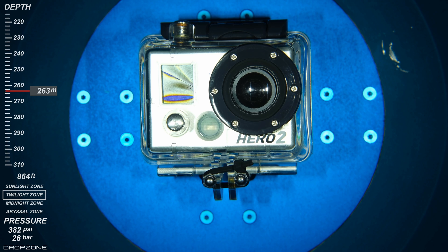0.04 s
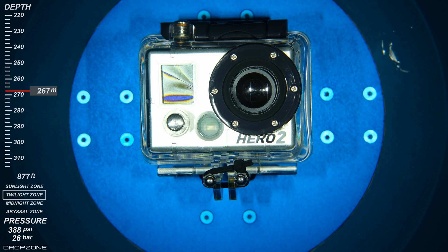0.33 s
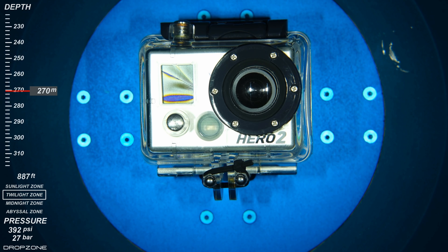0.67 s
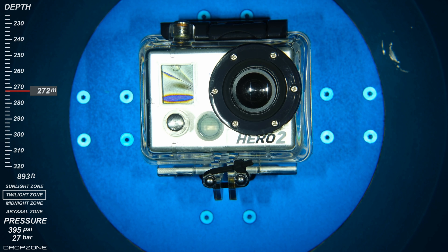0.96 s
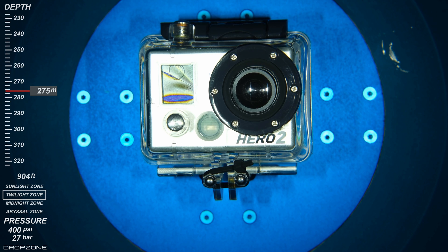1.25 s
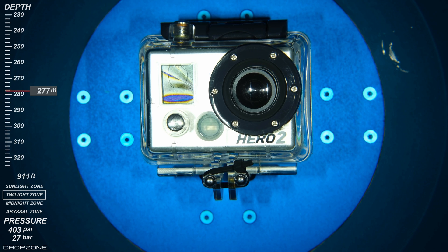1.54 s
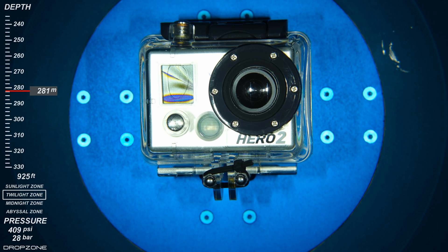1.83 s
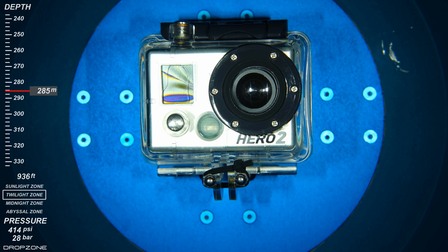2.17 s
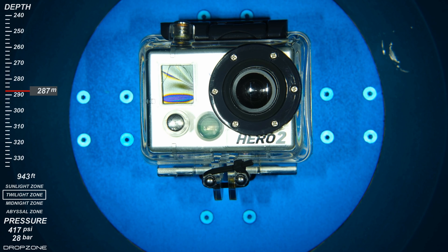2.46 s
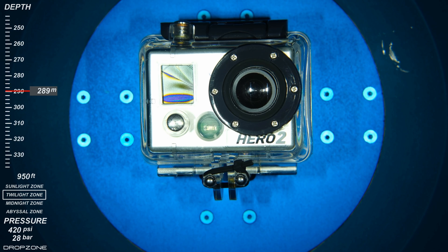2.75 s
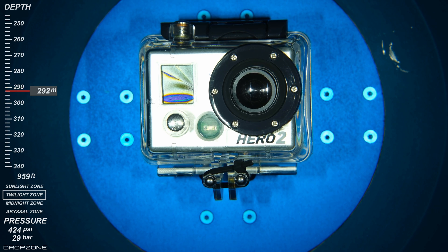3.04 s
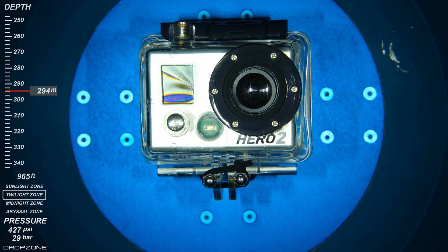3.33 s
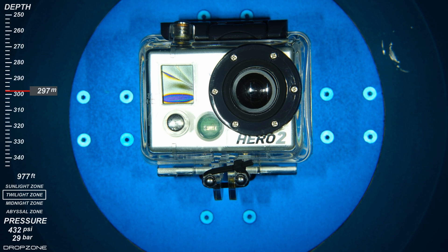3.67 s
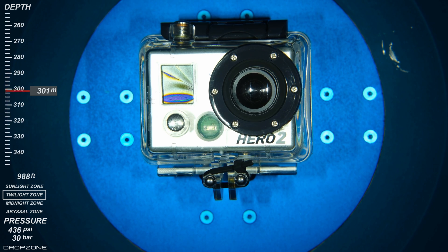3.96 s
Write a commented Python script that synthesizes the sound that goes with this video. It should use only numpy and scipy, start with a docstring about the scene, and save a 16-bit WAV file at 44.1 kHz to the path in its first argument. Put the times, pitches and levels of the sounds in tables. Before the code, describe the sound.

A plastic housing cracks sharply under water pressure, heard through a steel chamber's faintly ringing wall. Small ticks cluster at 0.15 seconds and scatter until 1.5. A loud crack comes at 2 seconds, lighter ones follow, then two strong cracks at 3.6 and 3.8. Throughout, a pump throbs low with soft, rapid valve knocks, alongside faint high water hiss and occasional tiny, dry electrical clicks.

```python
"""A plastic housing cracks and ticks under rising water pressure inside a steel test chamber.
The microphone listens in mono from outside, so each short tear comes through the ringing wall.
Behind the cracks, water hisses through a throttle in the wall's resonances over a low rumble,
and a slow piston pump throbs and knocks its valves. A few dry electrical clicks sit on the line."""
import sys
import numpy as np
from scipy import signal
from scipy.fft import rfft, irfft, next_fast_len
from scipy.io import wavfile
from scipy.ndimage import map_coordinates

SR = 44100
rng = np.random.default_rng(int(sys.argv[2]) if len(sys.argv) > 2 else 0)


def file_out(sig):
    """Save sig as 16-bit WAV at sys.argv[1]."""
    # one column per channel
    cols = np.atleast_2d(sig).T
    # limit, then scale
    lim = np.clip(cols, -1, 1)
    pcm = np.round(lim * 32767).astype(np.int16)
    wavfile.write(sys.argv[1], SR, pcm)


N = 176400

# wall resonances that the flow excites: pitch_hz, width_hz, gain_db
HISS_RESONANCES = [(1440, 93, -27), (1953, 110, -22.5), (2730, 224, -24), (3480, 400, -21.5),
                   (4234, 191, -8.5), (5060, 330, -10.5), (5405, 290, -1.5), (6090, 100, -10.5),
                   (6340, 160, -9.5), (6760, 350, -9), (7270, 240, -9), (8340, 600, -17),
                   (9540, 390, -13.5), (10140, 330, -7), (10590, 290, -6.5), (11100, 550, -12),
                   (11490, 270, -7.5), (11920, 250, -7.5), (12240, 180, -3), (12200, 230, -14.5),
                   (12920, 280, -10), (13800, 250, -23), (14100, 130, -14), (14300, 200, -14.5),
                   (15100, 150, -15.5)]
# the hiss as heard outside the wall: time_s, level_db
HISS_LEVEL = [(0, -69.5), (.4, -70), (.7, -68), (1.8, -68), (2.6, -67), (4, -70.5)]
# spectrum of the rumble under it: frequency_hz, gain_db
RUMBLE_COLOUR = [(15, -17), (40, 2.5), (70, 2), (110, -12.5), (160, -20.5), (300, -29), (600, -39.5),
                 (1200, -48), (3000, -66)]
# bands that come and go in the hiss: start_s, end_s, pitch_hz, width_hz, level_db
SINGING_BANDS = [(0, 0.17, 5480, 30, -75.5), (0, 0.058, 6290, 40, -74), (1.2, 1.92, 12000, 553, -77),
                 (.5, 1.61, 6430, 238, -80), (.6, 2.6, 8190, 293, -84.5), (1.15, 3.55, 5454, 120, -74.5),
                 (2.15, 4, 10150, 453, -73), (2.9, 4, 6770, 301, -76.5), (3.1, 4, 8830, 110, -85),
                 (3.0, 4, 9250, 248, -82)]
# thumps in each pump turn: offset_s, relative_db, pitch_hz, half_length_s, growth_db_per_s
SUCTION_THUMPS = [(0, -37.5, 61, 0.011, 0.66), (0.055, -45.5, 30.5, .007, 1),
                  (0.116, -44.5, 48.4, 0.0098, 2)]
DELIVERY_THUMPS = [(0.0369, -36.5, 31, 0.0061, .2), (.079, -43, 60.3, 0.0058, 1.4),
                   (-.0075, -54.5, 70, 0.0029, 0.44)]
# valve knocks in each turn: offset_s, level_db, pitch_hz, rise_s, t60_s, growth_db_per_s
VALVE_KNOCKS = [(-0.015, -62.5, 221, 0.0063, 0.063, 2.5), (.068, -57, 235.1, 0.0079, 0.085, -0.05),
                (.066, -63.5, 454.6, 0.0052, 0.077, 3), (.066, -66.5, 370, 0.0038, 0.045, 0),
                (.065, -81, 460, 0.0027, 0.022, -10.5), (-0.0002, -82.5, 455, 0.0039, .12, 4.5)]
# squirts as the valves open in each turn: offset_s, level_db, half_length_s
VALVE_SQUIRTS = [(-.021, -81, .003), (-.01, -77.5, 0.002), (.064, -79, .005)]
# spectrum of the squirts: frequency_hz, gain_db
SQUIRT_COLOUR = [(400, 1), (1000, -15), (1450, -4), (1800, -12), (2300, -11), (2700, 7), (3100, -4),
                 (3600, 0), (5000, -16)]
# cracks of the housing: start_s, level_db, tilt_db_per_octave, main_resonance_db
CRACKS = [(0.1324, -57, 2, -11), (0.1379, -49.5, 0, -4), (0.156, -52, -2, -5), (.1735, -64, -1, -2),
          (0.785, -69, 0, -3), (.8012, -60, -1, -1), (.8652, -53.5, 2.5, -2), (1.1785, -57, 2.5, -3),
          (1.1836, -65.5, -4.5, -3), (1.3523, -60, -1, 1), (1.4472, -61, -1.5, -5),
          (1.963, -32.5, -1.5, -2.5), (2.0385, -59, -2.5, -6), (2.2385, -48, 5, -16), (2.46, -60, 0, -9),
          (2.543, -64, -2, -1), (2.8848, -44.5, 8, -10), (3.239, -57, -2, -14), (3.2469, -51, 1, -1),
          (3.5994, -36.5, 2, -3.5), (3.8439, -33.5, -2.5, 4.5), (3.8566, -50.5, -4.5, 4),
          (3.888, -60, -3.5, 2), (3.993, -47.5, 1, -5)]
# resonances that a crack excites: pitch_hz, width_hz, gain_db
CRACK_RESONANCES = [(1457, 71, -14), (1995, 147, -11), (2744, 226, -10.5), (3440, 530, -8.5),
                    (4090, 240, -10), (4570, 280, -8.5), (5398, 380, 3.5), (6340, 120, -4), (6840, 260, -3),
                    (7330, 330, -7), (8530, 350, -8), (9080, 140, -6), (9670, 150, -4), (10130, 380, -1),
                    (10480, 250, -3), (11160, 550, -14), (11700, 260, -18), (12240, 150, -8),
                    (12900, 310, -17), (13900, 250, -12.5), (14400, 220, -16)]
# the chamber's longer ring: pitch_hz, gain_db, t60_s
CHAMBER_RING = [(1464, -34.5, 0.098), (1920, -33, .06), (2030, -32, .04), (3330, -37.5, 0.1),
                (5160, -27.5, 0.068)]
# electrical clicks on the line: time_s, peak_db
LINE_CLICKS = [(.133, -42.5), (0.168, -41.5), (0.2978, -46.5), (.623, -60.5), (0.933, -43), (1.7629, -44),
               (1.973, -40.5), (2.1781, -44), (2.198, -48.5), (2.3063, -63), (2.4979, -47.5), (2.7732, -40),
               (3.003, -41), (3.2077, -40.5), (3.5529, -49)]


def amp(db):
    return 10 ** (np.asarray(db) / 20)


def unit_rms(x):
    return x / np.sqrt(np.mean(x ** 2) + 1e-20)


def fade(t, t60):
    """Holds at 1 until t = 0, then falls 60 dB every t60 seconds."""
    return np.exp(-np.log(1000) * np.maximum(t, 0) / t60)


def add(out, start_s, x):
    """Mix x into out from start_s."""
    i = int(round(start_s * SR))
    a, b = max(i, 0), min(i + len(x), N)
    if b > a:
        out[a:b] += x[a - i:b - i]


def filtered(x, response):
    """Pass x through a response given as a function of frequency."""
    size = next_fast_len(len(x) + 8192)
    return irfft(rfft(x, size) * response(np.fft.rfftfreq(size, 1 / SR)), size)[:len(x)]


def noise(colour):
    """Noise of rms 1, its spectrum drawn through (Hz, dB) points."""
    hz, db = np.transpose(colour)
    white = rng.standard_normal(N)
    return unit_rms(filtered(white, lambda f: amp(np.interp(np.log(f + 1), np.log(hz + 1), db))))


def peaks(f, resonances):
    """Gain of a set of resonances with steep skirts."""
    power = sum(amp(2 * db) / (1 + ((f - hz) / (0.92 * width)) ** 2) ** 3 for hz, width, db in resonances)
    return np.sqrt(power)


def noise_band(hz, width, db=0):
    """White noise through one resonance."""
    gain = peaks(np.fft.rfftfreq(N, 1 / SR), [(hz, width, db)])
    return irfft(rfft(rng.standard_normal(N)) * gain, N)


def wobble(knots_per_s):
    """A smooth random curve."""
    positions = np.linspace(0, knots_per_s * N / SR, 200)
    curve = map_coordinates(rng.standard_normal(64), [positions], mode="mirror")
    return np.interp(np.arange(N), np.linspace(0, N, len(curve)), curve)


def minimum_phase(gain):
    """A response with this gain that rings only after it is struck."""
    cepstrum = irfft(np.log(np.maximum(gain, 1e-6)))
    half = len(cepstrum) // 2
    cepstrum[1:half] *= 2
    cepstrum[half + 1:] = 0
    return np.exp(rfft(cepstrum))


def throttle_flow(wander_db=1.57, rumble_db=-66, singing_fade_s=0.094):
    """Throttled water hisses in the wall's resonances, each drifting in level, over a low rumble."""
    t = np.arange(N) / SR
    floor = amp(-27.5) * rng.standard_normal(N)
    bands = sum(noise_band(*row) * amp(wander_db * wobble(knots_per_s=3)) for row in HISS_RESONANCES)
    hiss_db = np.interp(t, *np.transpose(HISS_LEVEL))
    out = amp(hiss_db) * unit_rms(floor + bands) + amp(rumble_db) * noise(RUMBLE_COLOUR)
    for start, end, hz, width, db in SINGING_BANDS:
        gate = np.clip(np.minimum(t - start, end - t) / singing_fade_s + 0.5, 0, 1)
        out += amp(db) * gate * unit_rms(noise_band(hz, width))
    return out


def piston_pump(first_turn_s=0.0699, turn_s=0.15981, pistons=3, ripple_db=-46.5, ripple_lag_s=0.0022):
    """Every turn brings one swell per piston, soft thumps, valve knocks and squirts."""
    count = np.arange(-1, N // SR * 7)
    turn_starts = first_turn_s + turn_s * count + 1.285e-5 * count ** 2  # the load slows it slightly
    shaft_angle = 2 * np.pi * np.interp(np.arange(N) / SR - ripple_lag_s, turn_starts, count)
    out = -amp(ripple_db) * np.cos(pistons * shaft_angle)
    squirt_envelope = np.zeros(N)
    t = np.arange(SR // 10) / SR
    middle = t.mean()
    centred = t - middle
    for turn in turn_starts:
        past_halfway_s = turn - N / SR / 2
        for weight, thumps in ((-0.72, SUCTION_THUMPS), (0.85, DELIVERY_THUMPS)):
            for offset, db, hz, half, growth in thumps:
                thump = np.cos(2 * np.pi * hz * centred) * np.exp(-(centred / half) ** 2)
                add(out, turn + offset - middle, weight * amp(db + growth * past_halfway_s) * thump)
        for offset, db, hz, rise, t60, growth in VALVE_KNOCKS:
            attack = 1 - np.exp(-(t / rise) ** 2)
            knock = np.sin(2 * np.pi * hz * t) * attack * fade(t, t60)
            add(out, turn + offset, amp(db + growth * past_halfway_s + rng.normal()) * knock)
        for offset, db, half in VALVE_SQUIRTS:
            opening = np.exp(-(centred / half) ** 2)
            add(squirt_envelope, turn + offset - middle, amp(db + rng.normal()) * opening)
    return out + squirt_envelope * noise(SQUIRT_COLOUR)


def tear(envelope, passes=8):
    """Tearing plastic: a random burst, evened out to excite all frequencies alike."""
    burst = envelope * rng.standard_normal(len(envelope))
    for _ in range(passes):
        flat = irfft(np.exp(1j * np.angle(rfft(burst))), len(burst))
        burst = envelope * np.cos(np.angle(signal.hilbert(flat)))
    return burst


def housing_cracks(slip_s=0.0017, main_hz=5260, main_width_hz=250, size=4096):
    """Each crack is a very short tear heard through the wall's resonances; the chamber rings faintly."""
    out = np.zeros(N)
    t, f = np.arange(size) / SR, np.fft.rfftfreq(size, 1 / SR)
    snap = amp(4) * fade(t, t60=0.003)  # the first break is the hardest
    slip = fade(t - slip_s, t60=0.0023)
    water_scatter = amp(-13.5) * fade(t, t60=0.016)
    wall = peaks(f, CRACK_RESONANCES) + amp(-32) * f / (f + 1500)
    main_resonance = np.exp(-((f - main_hz) / main_width_hz) ** 2)
    for start, db, tilt, main_db in CRACKS:
        colour = wall * amp(tilt * np.log2((f + 300) / 6000) + main_db * main_resonance)
        burst = irfft(rfft(tear(snap + slip + water_scatter)) * minimum_phase(colour))
        burst /= np.sqrt(np.sum(burst ** 2) / (slip_s * SR))  # same energy as rms 1 over the slip
        ring = np.zeros(size)
        for hz, ring_db, t60 in CHAMBER_RING:
            gain = amp(ring_db + tilt * np.log2(hz / 6000) + rng.normal())
            ring += gain * fade(t, t60) * np.sin(2 * np.pi * hz * t)
        add(out, start, amp(db) * (burst + ring))
    return out


def line_clicks(width_s=0.00016):
    """Tiny square electrical pulses on the microphone line; they ring nothing."""
    out = np.zeros(N)
    pulse = np.clip(width_s * SR - np.arange(SR // 1000), 0, 1)
    for time_s, db in LINE_CLICKS:
        add(out, time_s - width_s / 2, amp(db) * pulse)
    return out


def scene():
    """One channel from outside the chamber wall."""
    return (housing_cracks() + line_clicks() + piston_pump() + throttle_flow())[None]


def record(dry):
    """The microphone chain passes no steady pressure and cuts off steeply at the top."""
    top_hz = 15000
    return np.array([filtered(x - x.mean(), lambda f: 1 / np.sqrt(1 + (f / top_hz) ** 200)) for x in dry])


dry = scene()
out = record(dry)
file_out(out)
```